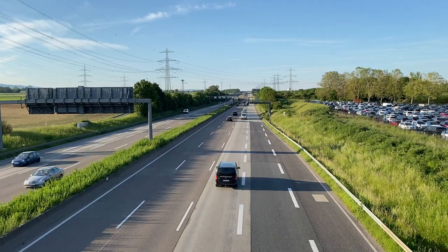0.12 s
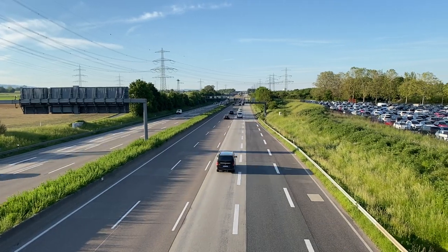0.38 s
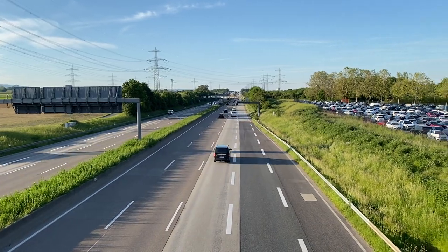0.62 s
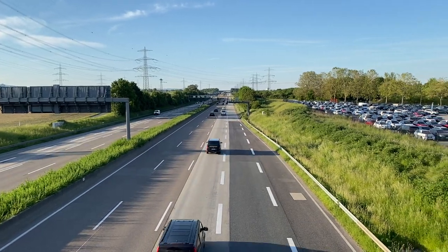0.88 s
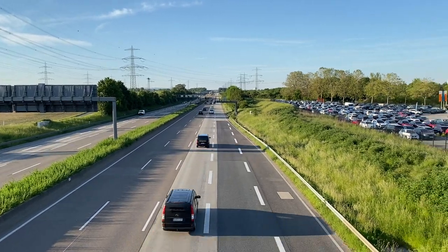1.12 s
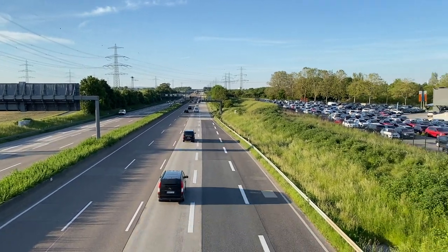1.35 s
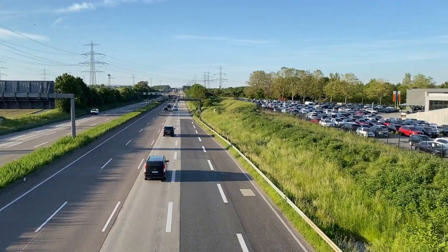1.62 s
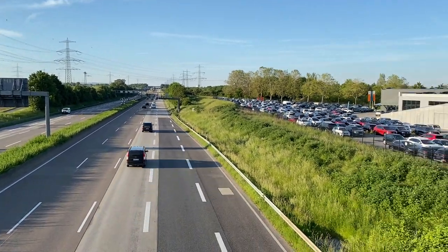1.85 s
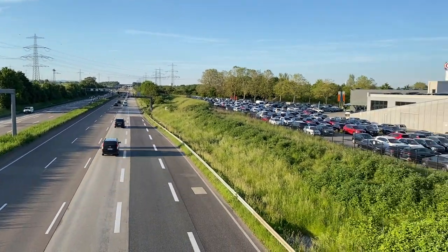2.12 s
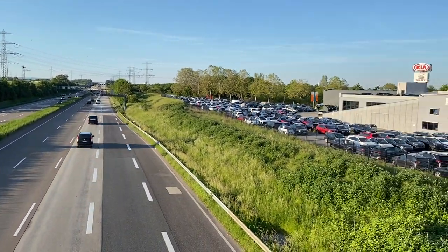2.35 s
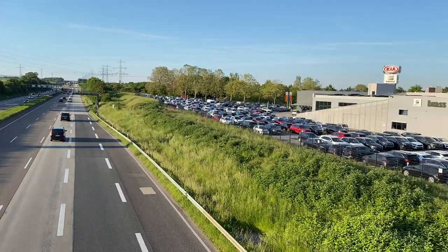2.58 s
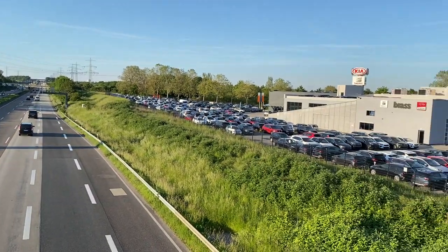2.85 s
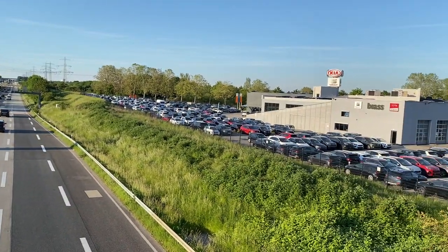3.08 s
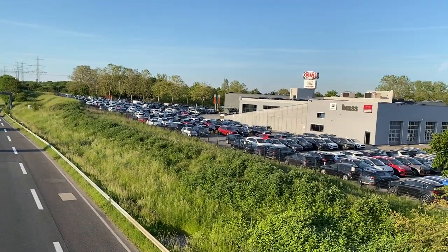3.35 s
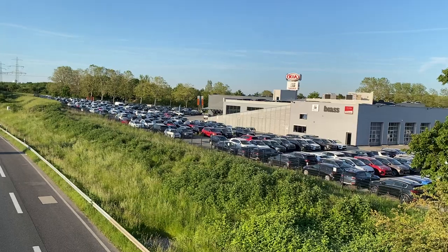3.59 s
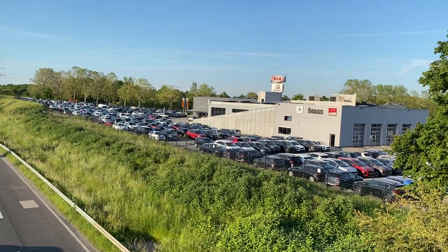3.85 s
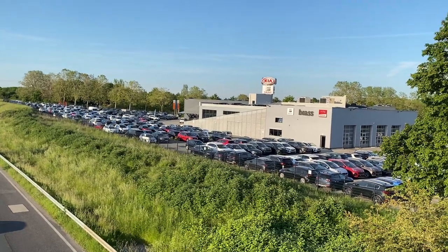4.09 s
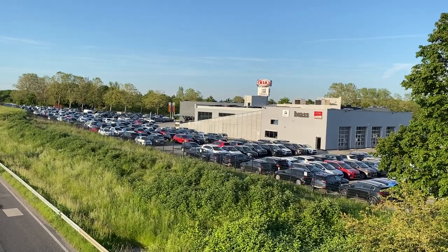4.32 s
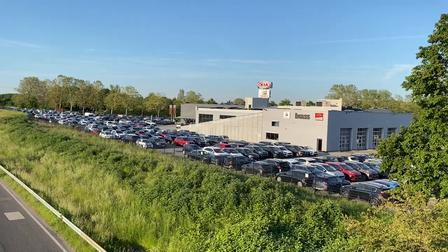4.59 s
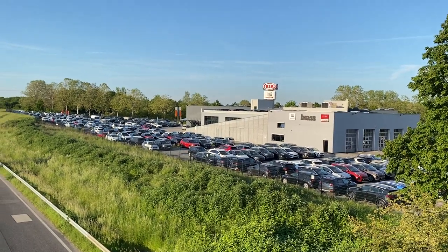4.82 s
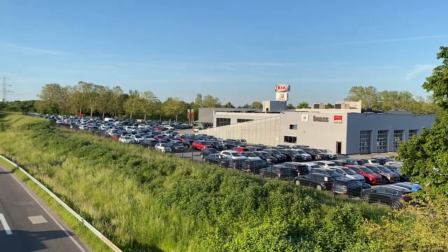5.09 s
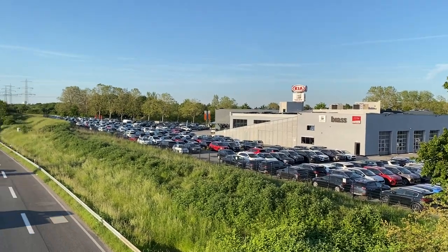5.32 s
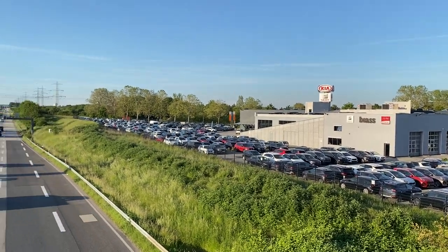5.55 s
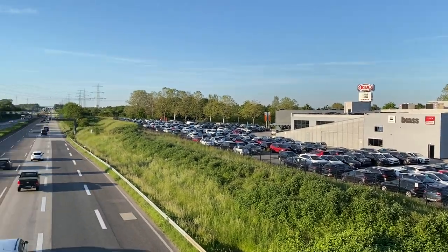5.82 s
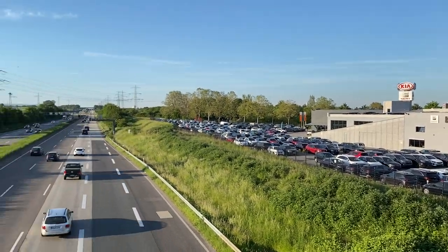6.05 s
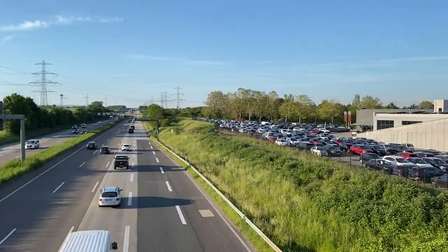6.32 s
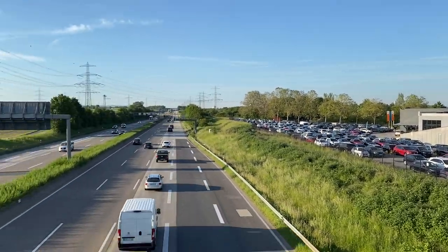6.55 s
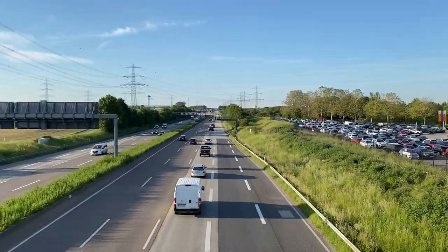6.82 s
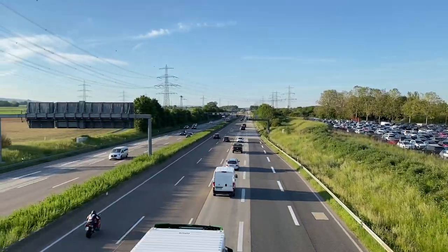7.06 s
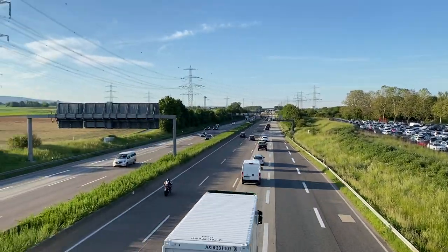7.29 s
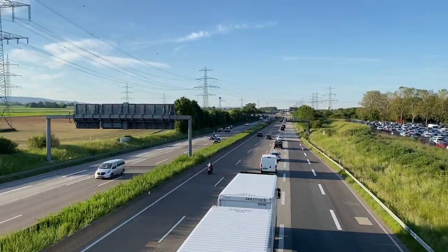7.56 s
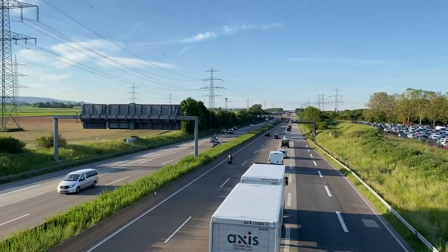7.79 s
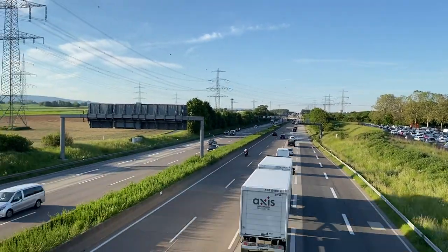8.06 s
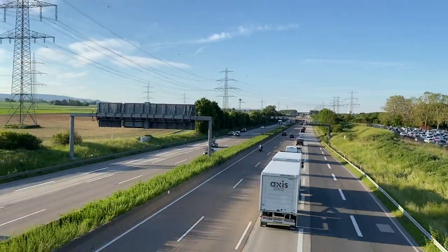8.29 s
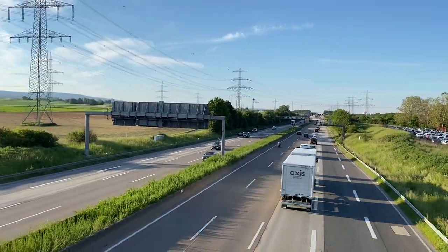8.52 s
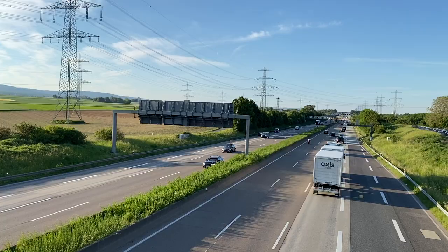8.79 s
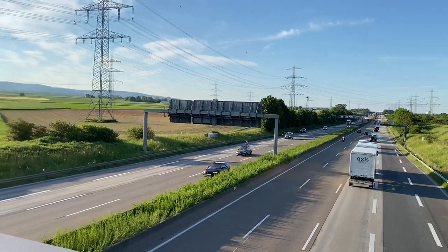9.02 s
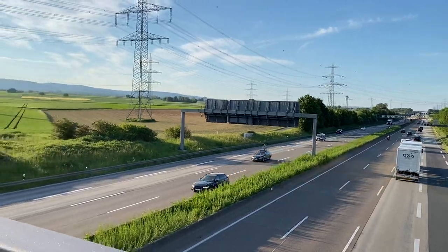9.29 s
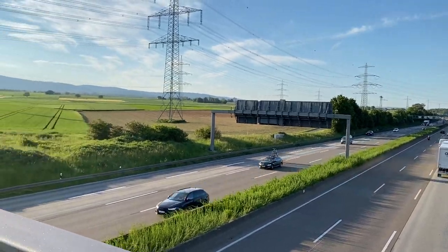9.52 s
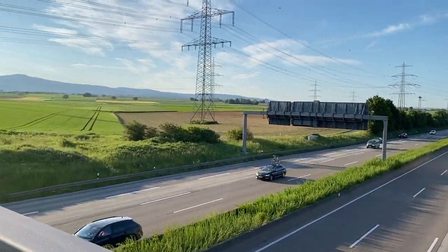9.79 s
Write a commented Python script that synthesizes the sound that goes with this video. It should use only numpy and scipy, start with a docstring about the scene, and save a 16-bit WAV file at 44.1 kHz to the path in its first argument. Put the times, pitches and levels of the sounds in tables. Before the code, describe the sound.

Open-air motorway from a footbridge, close stereo, no room echo. From 0 s a car's broad tyre roar and low rumble swell and pass, with two tiny knocks near 0.7 s. The rush thins from about 1 s, a faint bright puff of hiss sits left at 1.7 s, and the sound turns dull and distant until 3.2 s. Two more knocks come around 3.7 s. Traffic swells strongly from 4 to 6.5 s, with throbbing low engine hums and bright tyre hiss, leaning left. A motorcycle's thin, wavering whine creeps in from 4 s, then bursts into a loud raspy snarl around 6.7 to 7.2 s, its pitch sliding downward, before being abruptly masked by a lorry at 7.3 s. Only a faint lower whine lingers. Moderate rushes and hums continue, swelling near 8 s, thinning towards 9 s; soft knocks fall around 8.5 s and 9.8 s as a deep engine hum rises.

```python
"""Motorway under a footbridge

Tyre roar of many cars swells and fades as noise in bands; engines hum as wavering sine tones.
A motorcycle, a firing note with overtones and rasp, approaches behind the deck, bursts into view
beneath it and is then hidden by a lorry. A puff of hiss and a few small knocks are heard too.
A hand-held two-port microphone pans right and back."""
import sys
import numpy as np
from scipy import signal
from scipy.fft import rfft, irfft, next_fast_len
from scipy.io import wavfile
from scipy.ndimage import uniform_filter1d, map_coordinates

SR = 44100
rng = np.random.default_rng(int(sys.argv[2]) if len(sys.argv) > 2 else 0)


def ratio_of_db(decibels):
    """Turn decibels (scalar or array-like) into linear amplitude factors; 0 dB maps to 1."""
    return 10 ** (np.asarray(decibels, float) / 20)


def unload_audio(sound):
    """Save the sound as a 16-bit wav file, at the path given as the first command line argument."""
    columns = np.transpose(np.atleast_2d(sound))
    # keep every value between -1 and 1, then stretch to whole-number steps
    steps = np.round(np.clip(columns, -1, 1) * 32767)
    wavfile.write(sys.argv[1], SR, steps.astype(np.int16))


N = 436580  # length in samples
BAND_SHARE = 0.09  # width of a boosted band, or of the dull edge, as a share of its frequency


def unit(x):
    """Scaled to rms 1."""
    return x / np.sqrt(np.mean(np.abs(x) ** 2) + 1e-20)


def along(points, hz):
    """Columns of (Hz, ..) rows read on a log frequency axis."""
    f, *cols = np.transpose(points)
    return [np.interp(np.log(hz + 1), np.log(f + 1), c) for c in cols]


def curves(rows):
    """One value per sample for each column after the time."""
    s, *cols = np.transpose(rows)
    return [np.interp(np.arange(N) / SR, s, c) for c in cols]


def during(rows, fade=0.021):
    """1 while the table lasts, fading to 0 at its ends over fade seconds."""
    t = np.arange(N) / SR
    return np.clip(np.minimum(t - rows[0][0], rows[-1][0] - t) / fade + 0.5, 0, 1)


def wobble(rate):
    """A smooth random curve, rate knots a second."""
    knots = rng.standard_normal(int(N * rate / SR) + 4)
    coarse = map_coordinates(knots, [np.arange(0, N, 20) * rate / SR])
    return np.repeat(coarse, 20)[:N]


def ports(x, lead_ms):
    """A point source reaches the left port lead_ms before the right."""
    shift = lead_ms * SR / 2000  # half the lead, in samples
    return np.array([map_coordinates(x, [np.arange(N) + side * shift], mode="nearest")
                     for side in (1, -1)])


def rush(spectrum, shares, bearing, patchy_db):
    """Stereo noise of rms 1: one part from the bearing, one from ahead, the rest diffuse, all in patches."""
    hz, t, (lane, ahead, *diffuse) = signal.stft(rng.standard_normal((4, N)), SR, nperseg=512)
    patches = uniform_filter1d(uniform_filter1d(rng.standard_normal(lane.shape), 5, 0), 12, 1)
    # a time lead between the ports is a phase turn that grows with frequency
    turn = np.exp(1j * np.pi * np.outer(hz, np.interp(t, *bearing)) / 1000)
    lane_share, ahead_share = np.clip(along(shares, hz), 0, 1)[..., None]
    rest = np.clip(1 - lane_share - ahead_share, 0, 1)
    pair = np.sqrt(lane_share) * lane * [turn, turn.conj()]
    pair = pair + np.sqrt(ahead_share) * ahead + np.sqrt(rest) * diffuse
    pair = unit(pair * ratio_of_db(along(spectrum, hz)[0][:, None] + patchy_db * unit(patches)))
    pair = pair / np.sqrt(len(hz) * 4 / 3)  # rms 1 once back in time
    return signal.istft(pair, SR, nperseg=512)[1][:, :N]


def note(hz, waver):
    """Running phase of an engine note whose speed wavers by a small share."""
    return 2 * np.pi * np.cumsum(hz * (1 + waver * wobble(14))) / SR


def swells(x, rows):
    """Soft bumps in time and frequency, each gliding at its own rate, laid on a sound."""
    hz, t, z = signal.stft(x, SR, nperseg=512)
    boost_db = 0
    for s, length, centre, db, glide in rows:
        off_time = (t - s) / length
        off_band = (hz[:, None] - glide * (t - s) - centre) / (BAND_SHARE * centre)
        boost_db = boost_db + db * np.exp(-off_time ** 2 - off_band ** 2)
    return signal.istft(z * ratio_of_db(boost_db), SR, nperseg=512)[1][:, :N]


# Traffic as a whole. Each row: time in seconds, then body drone, tyre roar and near hiss in dB.
TRAFFIC = [(0, -30.5, -24, -38.5), (.3, -28, -22.5, -36), (.72, -26.5, -26.5, -35.5), (.9, -32, -28, -36.5),
           (1.78, -34, -29, -41), (1.86, -35.5, -31.5, -45.5), (2.83, -36.5, -33.5, -44.5),
           (3.12, -33, -33, -45.5), (3.25, -28, -28, -45.5), (3.45, -30, -25.5, -41),
           (3.95, -30, -27.5, -39.5), (4.15, -22.5, -22, -36), (4.47, -23.5, -20.5, -31.5),
           (4.98, -29, -21.5, -34), (5.5, -26, -21.5, -35), (6.5, -22.5, -22, -33),
           (7.33, -29.5, -33.5, -37), (7.79, -32.5, -30, -41), (8.0, -28.5, -26.5, -36.5),
           (8.66, -30.5, -29.5, -37.5), (9, -32.5, -34, -43.5), (9.47, -31.5, -31.5, -41.5),
           (9.9, -25.5, -27.5, -39.5)]
# Tone colour of each part of the road noise. Each row: frequency in Hz, relative level in dB per Hz.
RUMBLE = [(18, -65), (28, -22), (40, -8), (56, 0), (86, -1), (123, -11.5), (220, -12.5), (290, -47),
          (480, -120)]
DRONE = [(94, -25), (160, -0.5), (268, -1), (622, -8), (750, -4.5), (980, -3), (1650, -120)]
ROAR = [(350, -51), (600, -11), (968, 0), (1610, -2.5), (1890, -7), (2300, -11.5), (2990, -21),
        (5060, -120)]
HISS = [(1500, -58), (2100, 4.5), (2600, 0), (3500, -4), (5000, -10), (6500, -21.5), (8000, -45)]
AIR = [(4000, -52), (6000, -3.5), (8500, -2), (11000, -11.5), (13500, -19.5), (15200, -23), (15700, -91)]  # the topmost hiss
# Direction of the loudest lane as the microphone turns. Traffic and engines share the lead,
# the motorcycle adds a swing; the level difference applies to every source.
# Each row: time in seconds, lead of the left port in ms, left-right level difference in dB.
BEARING = [(0, 0.15, 0.5), (.6, 0.13, 0.5), (1.2, 0.11, .2), (2.1, 0.14, 0.5), (3.1, 0.2, -0.5),
           (4.3, 0.35, 0.5), (5, 0.34, 0.5), (5.6, 0.29, 0), (6.5, 0.13, .5), (6.85, 0.092, -1),
           (7.15, 0.11, 0), (8.16, 0.055, -1), (8.6, 0.069, -0.5), (9.05, -0.06, -2), (9.4, -0.14, -1.5),
           (9.9, -0.1, -1)]
# Each row: frequency in Hz, power share (0-1) from that lane, power share (0-1) from straight ahead.
SHARES = [(60, .97, .01), (250, .9, .02), (800, .84, .06), (2000, .74, .18), (3500, .42, .42),
          (5500, .2, .6), (6500, .05, .8)]
# Single bands of the roar stand out or sink for a while. Each row: middle in seconds,
# length to each side in seconds, band in Hz, boost in dB, glide in Hz per second.
TREADS = [(0.26, 0.17, 960, 5.5, 0), (0.48, 0.46, 285, 12, 0), (2.3, 0.45, 813, 7.5, 0),
          (2.43, 0.67, 1414, 7, -100), (2.5, .25, 3900, 5, 0), (3.38, 0.11, 1220, 10, 0),
          (4.4, 0.33, 1200, 7, 0), (3.75, 0.25, 2620, 4.5, 0), (4.4, 0.25, 2250, 5, -200),
          (4.9, 0.22, 2500, 7, -300), (4.03, 0.15, 4650, -3, -1800), (5, .25, 2004, -5, 0),
          (4.93, 0.29, 913, 4.5, -300), (8.38, 0.97, 812, 7, -2)]


def traffic():
    """Overlapping parts of road noise; the air takes the top treble from far cars, so it swings most."""
    drone, roar, hiss = curves(TRAFFIC)
    rumble = -31 + 0.32 * (drone + 29.5)  # follows the drone, but more gently
    air = -58 + 1.41 * (hiss + 40.5)  # follows the near hiss, but more strongly

    def part(level_db, spectrum, patchy_db, flutter_db):
        """One part of the noise with its own random flutter."""
        noise = rush(spectrum, SHARES, np.transpose(BEARING)[:2], patchy_db)
        return ratio_of_db(level_db + flutter_db * wobble(7)) * noise

    road = part(rumble, RUMBLE, patchy_db=0.36, flutter_db=0.5)
    road += part(drone, DRONE, patchy_db=0.37, flutter_db=1.0)
    road += dulled(part(roar, ROAR, patchy_db=1.36, flutter_db=0.47))
    road += part(hiss, HISS, patchy_db=1.4, flutter_db=0.86)
    road += part(air, AIR, patchy_db=1.6, flutter_db=0.37)
    return swells(road, TREADS)


# The roar turns dull while the lanes are empty.
# Each row: time in seconds, upper edge in Hz, level change above it in dB.
EDGE = [(1.74, 2620, 0), (1.84, 2500, -11), (2.3, 2050, -9), (2.75, 1780, -7), (3.14, 1760, -6),
        (3.24, 2300, -2)]


def dulled(x):
    """The sound loses its treble above the moving edge."""
    hz, t, z = signal.stft(x, SR, nperseg=512)
    s, edge_hz, change_db = np.transpose(EDGE)
    above = np.clip((hz[:, None] / np.interp(t, s, edge_hz) - 1) / BAND_SHARE + 0.5, 0, 1)
    return signal.istft(z * ratio_of_db(above * np.interp(t, s, change_db)), SR, nperseg=512)[1][:, :N]


# The motorcycle's firing. Each row: time in seconds, firing rate in Hz, level of its note in dB.
BIKE = [(4.05, 381, -43), (4.25, 378, -32.5), (5, 366.4, -37), (5.4, 377.4, -32), (5.8, 372, -35.5),
        (6.1, 369.5, -27), (6.3, 365.5, -26.5), (6.6, 347.2, -19.5), (6.7, 334, -24), (6.771, 322.5, -12),
        (6.85, 314.1, -17), (6.93, 308, -18.5), (7.04, 305.3, -18.5), (7.1, 306, -30), (7.2, 304, -21.5),
        (7.25, 301, -21), (7.3, 295.7, -38), (7.48, 290.5, -35), (7.62, 290, -24), (7.86, 286, -36),
        (8.1, 284, -33.5), (8.3, 284.5, -42), (8.5, 284, -32.5), (8.9, 283.4, -26), (9.06, 281, -30),
        (9.12, 274, -39), (9.2, 269, -30.5), (9.3, 274, -32), (9.4, 281, -37), (9.6, 278, -31.5),
        (9.9, 278, -31.5)]
# The firing note thrown back from beyond the deck, already at the receding pitch.
# Each row: time in seconds, frequency in Hz, level in dB.
ECHO = [(6.3, 323.6, -65), (6.55, 323.3, -22), (6.72, 313.5, -20.5), (6.85, 290, -39)]
# While in view. Each row: time in seconds, then overtones, rasp and cylinder unevenness in dB.
SIGHT = [(6.6, -29, -40, -20), (6.68, -26.5, -32.5, -3), (6.768, -19, -18.5, -5.5), (6.8, -23, -23.5, -8),
         (6.9, -21.5, -24.5, -10.5), (6.985, -22.5, -21, -10), (7.01, -25, -26.5, -14),
         (7.07, -24, -30, -26), (7.115, -25.5, -24, -18), (7.15, -24, -32.5, -21), (7.215, -27.5, -26, -16),
         (7.26, -26, -34.5, -29), (7.33, -53, -34, -27)]
# Tone colour of the rasp. Each row: frequency in Hz, relative level in dB per Hz.
RASP = [(500, -44), (900, -4.5), (1800, -1.5), (2500, -2), (3300, -8), (5500, -12), (8000, -16),
        (11000, -20.5), (15300, -32), (15900, -93)]
# Directions in the rasp. Each row: frequency in Hz, power share (0-1) from the motorcycle's bearing,
# power share (0-1) from straight ahead.
CLOSE = [(60, 0.89, 0.044), (300, 0.49, 0.1), (2000, 0.71, 0.35), (5000, 0.57, 0.23)]
# Bands of the rasp flare or sink briefly, some sliding upward. Each row: middle in seconds,
# length to each side in seconds, band in Hz, boost in dB, glide in Hz per second.
LIFTS = [(6.82, 0.046, 4100, -9, 14000), (6.81, .07, 4900, 3.5, 4000), (6.88, 0.066, 2800, 10, 3000),
         (6.8, .07, 1900, -6, 0), (6.74, .05, 3000, -4, 0), (6.96, 0.075, 4350, 7, 5000),
         (7.074, 0.16, 1700, 7, 1500), (7.222, 0.04, 2200, 9.5, 0), (6.97, 0.027, 7500, 6, 0),
         (7.06, .06, 3300, 4, 0), (7.2, .06, 5250, 3, 0)]


def motorcycle():
    """The firing note carries far; overtones and rasp arrive only along the line of sight."""
    hz, db = curves(BIKE)
    tones_db, rasp_db, uneven_db = curves(SIGHT)
    clock = np.arange(N) / SR
    # passing at 6.74 s, it swings further left than the lanes
    lead_ms = curves(BEARING)[0] + 0.26 * np.exp(-((clock - 6.74) / 0.34) ** 2)
    phase = note(hz, waver=0.0028)
    seen = during(SIGHT, fade=0.16)
    firing = np.sqrt(2) * ratio_of_db(db + (2.0 + 1.7 * seen) * wobble(25)) * np.sin(phase)
    echo_hz, echo_db = curves(ECHO)
    echo = during(ECHO) * np.sqrt(2) * ratio_of_db(echo_db) * np.sin(note(echo_hz, waver=0.0126))
    tones = (firing + echo) * during(BIKE) + seen * ratio_of_db(tones_db) * overtones(phase, uneven_db)
    # exhaust noise pulses with the firing
    gate = 1 + 0.16 * np.sin(phase) + 0.06 * np.sin(phase / 2)
    rasp = swells(rush(RASP, CLOSE, (clock, lead_ms), patchy_db=1.8), LIFTS)
    return ports(tones, lead_ms) + seen * ratio_of_db(rasp_db) * gate * rasp


# Levels in dB of multiples 2, 3, .. of the firing rate, one number each.
OVERTONES_DB = [-0.5, 0.5, -11, -10.5, -13, -14.5, -12.5, -17, -23.5]
# Single overtones ring out briefly, each at its own moment. Each row: middle in seconds,
# length to each side in seconds, multiple of the firing rate, boost in dB.
SINGING = [(6.76, .05, 8, 14), (6.8, .06, 7, 17), (6.86, .045, 8, 13), (6.93, .05, 9, 12),
           (6.82, .08, 4, 19), (7.0, .11, 5, 15), (6.98, .09, 6, 13), (7.13, .08, 6, 17),
           (7.215, .035, 7, 16), (6.84, .035, 17, 13), (6.935, .035, 17, 13), (6.95, .1, 2, 3),
           (7.07, .15, 3, 6), (7.17, .07, 5, 9), (6.74, .05, 6, 10), (6.88, .04, 10, 10)]


def overtones(phase, uneven_db):
    """Multiples of the firing; four unequal cylinders add quarter orders between them."""
    fall_db, half_db = 1.4, 3.5  # loss for each multiple; half orders over quarter orders
    view = slice(round(SIGHT[0][0] * SR) - SR // 10, round(SIGHT[-1][0] * SR) + SR // 10)
    t, stack = np.arange(N)[view] / SR, np.zeros(N)
    orders = list(enumerate(OVERTONES_DB, start=2))
    orders += [(k, -3.5 - fall_db * k) for k in range(11, 20)]
    for quarters in range(5, 46):
        if quarters % 4:
            level = uneven_db[view] - fall_db * quarters / 4 + half_db * (quarters % 2 == 0)
            orders.append((quarters / 4, level))
    for order, level in orders:
        # each order comes and goes on its own
        level = level + 2.45 * wobble(12)[view] + 1.3 * wobble(35)[view]
        for s, length, multiple, boost_db in SINGING:
            if multiple == order:
                level = level + boost_db * np.exp(-((t - s) / length) ** 2)
        stack[view] += ratio_of_db(level) * np.sin(order * phase[view] + rng.uniform(0, 2 * np.pi))
    return stack


# Engine notes, one list of rows for each. Each row: time in seconds, frequency in Hz, level in dB.
HUMS = [
    [(0, 60.6, -36), (.8, 64, -38.5), (1.6, 60, -43.5), (3.28, 64.5, -34), (3.94, 69.3, -31.5),
     (4.66, 67.25, -31.5), (6.59, 63.2, -29.5), (7.7, 60, -42), (8.16, 64, -32), (9.77, 62.54, -30.5),
     (9.82, 63.5, -20), (9.95, 64, -18)],
    [(2.4, 145.4, -41), (3.4, 139.6, -36), (3.8, 136.2, -35.5), (4, 131.8, -31), (4.14, 125, -19.5),
     (4.32, 121.3, -37), (4.66, 120, -32), (4.84, 120.2, -24.5), (5.4, 119.8, -27.5), (5.9, 121, -32.5),
     (6.5, 122, -28.5), (6.65, 122, -42)],
    [(7.05, 207.1, -32), (8.2, 207.6, -40), (8.8, 198.7, -35.5), (9.3, 196.5, -40.5)],
    [(7.05, 403, -43), (7.5, 401, -41.5), (7.6, 400, -35.5), (8.15, 398, -34), (8.35, 398, -57),
     (9.35, 397.7, -44), (9.9, 395, -51)],
]
# How far each engine note strays, one number in Hz for each note.
WAVER_HZ = [3, 1.57, 2.49, 1.1]


def engines():
    """Low firing notes of cars and lorries, throbbing as their paths interfere."""
    out = np.zeros(N)
    for rows, waver_hz in zip(HUMS, WAVER_HZ):
        hz, db = curves(rows)
        level = during(rows) * ratio_of_db(db + 1.36 * wobble(9))
        out += level * np.sqrt(2) * np.sin(note(hz, waver_hz / hz))
    return ports(out, curves(BEARING)[0])


# Small knocks. Each row: start in seconds, level in dB before the decay, frequency in Hz,
# second mode in dB against the first.
TICKS = [(0.656, -7, 1160, -7), (0.718, -14, 1100, -14), (3.655, -10, 994, -18), (3.758, -5.5, 1110, -20),
         (8.475, -11.5, 800, -18), (8.559, -14.5, 790, -12), (9.836, -10, 750, -10)]


def knocks():
    """Each knock rings in two modes that die together, by 60 dB in 18 cycles of the first."""
    out, t = np.zeros(N), np.arange(SR // 25) / SR
    for s, db, hz, upper_db in TICKS:
        shape = ratio_of_db(db - 60 * t * hz / 18) * (1 - np.exp(-t / 0.00088))
        modes = np.sin(2 * np.pi * hz * t) + ratio_of_db(upper_db) * np.sin(2 * np.pi * 2.3 * hz * t)
        out[round(s * SR):][:len(t)] += shape * modes
    return out


def puff():
    """A short bright puff, a smooth swell of band-passed noise, stronger on the left."""
    band = signal.butter(2, [4000, 8500], "bandpass", fs=SR, output="sos")
    hiss = unit(signal.sosfilt(band, rng.standard_normal(N)))
    swell = np.exp(-((np.arange(N) / SR - 1.715) / 0.055) ** 2)  # middle and length in seconds
    return ratio_of_db([[-46], [-53]]) * swell * hiss


def scene():
    """All sources at the two ports, leaning left or right as the microphone turns."""
    lean_db = curves(BEARING)[1] / 2
    sources = traffic() + motorcycle() + engines() + knocks() + puff()
    return ratio_of_db([lean_db, -lean_db]) * sources


def low_pass(x):
    """Removes everything above the highest recorded frequency."""
    return signal.sosfilt(signal.butter(12, 15700, fs=SR, output="sos"), x)


# The housing shades the ports. Each row: frequency in Hz, left-right level difference in dB.
TILT = [(60, 0), (300, -1.5), (640, -1), (1100, -1), (1900, -5), (2800, 1), (5000, 3), (6500, 4.5)]


def record(dry):
    """Port shading; above a crossover one signal feeds both channels, the right leading ever more."""
    size = next_fast_len(N + 8192)
    hz, pair = np.fft.rfftfreq(size, 1 / SR), rfft(dry, size)
    pair = pair / (1 + (35 / (hz + 1)) ** 4)  # the microphone's bass cut
    tilt_db = along(TILT, hz)[0] / 2
    shaded = pair * ratio_of_db([tilt_db, -tilt_db])
    single = np.clip((hz - 6000) / 700, 0, 1)  # crossover from 6000 to 6700 Hz
    # lead of the right channel in half cycles
    turns = np.interp(hz, [7600, 8500, 9500, 10500, 11700, 12600, 13700, 14600],
                      [0, 1, 1, 2, 2, 3, 3, 4])
    spread = pair[0] * np.exp(np.outer([-0.5j, 0.5j], np.pi * turns))
    mix = irfft((1 - single) * shaded + single * spread, size)[:, :N]
    mix = mix / (1 + np.abs(mix / 0.97) ** 6) ** (1 / 6)  # the converter rounds off the highest peaks
    return low_pass(mix)


dry = scene()
out = record(dry)
unload_audio(out)
```